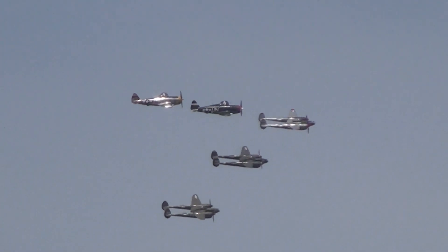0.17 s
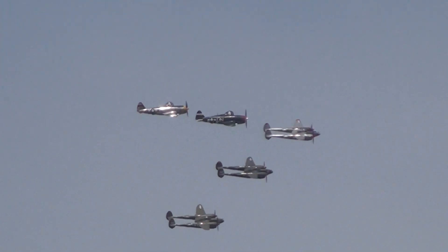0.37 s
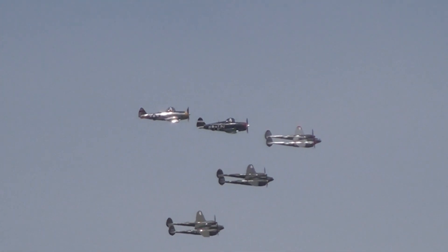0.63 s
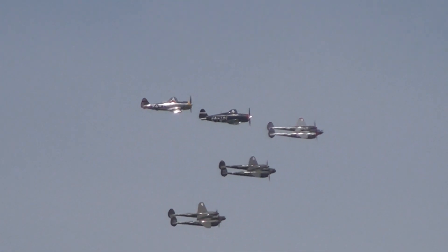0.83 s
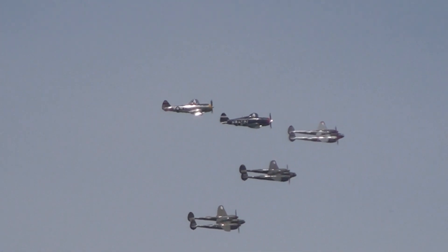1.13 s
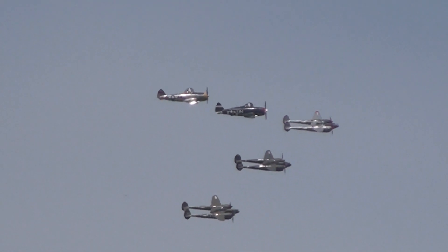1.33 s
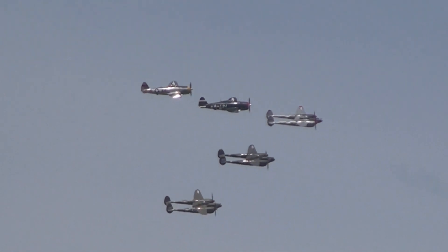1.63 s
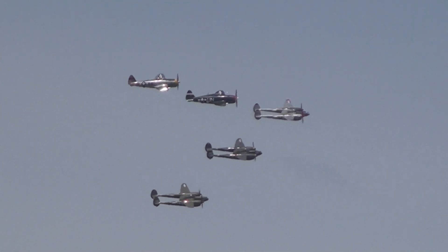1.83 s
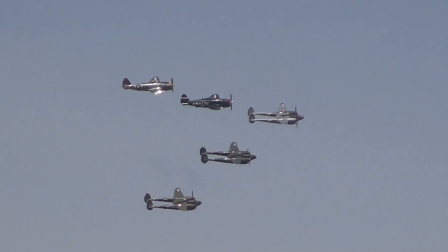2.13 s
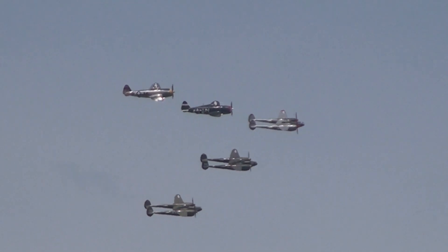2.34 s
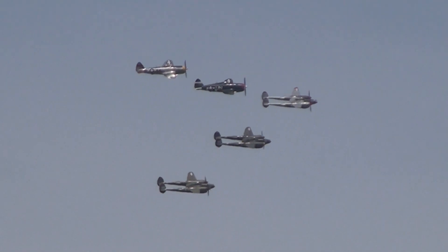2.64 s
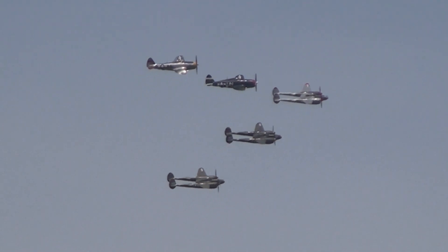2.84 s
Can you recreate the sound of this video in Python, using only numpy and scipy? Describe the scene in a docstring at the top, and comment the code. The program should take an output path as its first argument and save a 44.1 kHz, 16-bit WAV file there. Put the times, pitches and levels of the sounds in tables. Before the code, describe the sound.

A distant formation of piston-engined propeller aircraft drones throughout, low and throbbing, with a fluttering exhaust roar strongest around 0.4-0.7 s, pitch sagging slightly and the roar weaker by the end. Faint crackly scuffs and ticks near the microphone are scattered from 0.2 to 1.8 s. Hard, dry clicks cluster at 1.56-1.76 s, loudest near 1.67, with a very faint one at 2.85. Light wind rumble and soft hiss outdoors.

```python
"""Distant fighters in formation, clicks at the microphone

Piston-engined fighters pass far off: six propellers drone, three at nearly equal speeds that beat and three
slower, built from partials of their blade rates. Jittered firing pulses and puffs of gas merge into an exhaust
roar that fades and swells in the moving air, and the pitch sags slowly. Close to the microphone a small hard
object clicks, as short ringing modes with a noise crack, and rustles in noise bursts, amid light wind and hiss."""
import sys
import numpy as np
from scipy import signal
from scipy.fft import rfft, irfft
from scipy.io import wavfile
from scipy.ndimage import map_coordinates

SR = 44100
rng = np.random.default_rng(int(sys.argv[2]) if len(sys.argv) > 2 else 0)


def log_audio(samples):
    """Write samples as a 16-bit WAV file to the path given in sys.argv[1]."""
    # one column per channel
    frames = np.atleast_2d(samples).T
    # limit to full scale, then quantise
    limited = np.clip(frames, -1, 1)
    pcm = np.round(limited * 32767).astype(np.int16)
    wavfile.write(sys.argv[1], SR, pcm)


N = 132300
T = np.arange(N) / SR

# leading propellers, beating together: (blade rate before sag and wander [Hz], level among them [dB])
LEAD_PROPS = [(54.8, -1.5), (54.05, -13.5), (55.95, -28)]
# slower propellers under the drone: (blade rate before sag and wander [Hz], level before partial levels [dB])
SLOW_PROPS = [(49.57, -35), (46.34, -39.5), (43.02, -37)]
# swell of the far exhaust roar, before its trims: (time [s], level [dB])
ROAR_SWELL = [(0.0, -32), (0.08, -30.5), (0.2, -27.5), (0.34, -29.5), (0.44, -25), (0.54, -29.5),
              (0.64, -22), (0.74, -31.5), (0.78, -27.5), (1.14, -27.5), (1.2, -32.5), (1.52, -30.5),
              (1.6, -28), (1.66, -30.5), (1.72, -27.5), (1.84, -27), (1.9, -30.5), (2.04, -26.5),
              (2.18, -31.5), (2.6, -30), (2.78, -35), (2.82, -31.5), (3.0, -34.5)]


def undb(db):
    """Amplitude factor of a level in dB."""
    return 10 ** (np.asarray(db) / 20)


def unit(x):
    """Scale to an RMS of 1."""
    return x / np.sqrt(np.mean(x ** 2))


def curve(rows):
    """Gain over time from (time [s], level [dB]) points."""
    return undb(np.interp(T, *np.array(rows).T))


def colour(x, points):
    """Filter by (frequency [Hz], gain [dB]) points, falling a further 12 dB per octave outside them."""
    hz, db = np.array(points).T
    f = np.maximum(np.fft.rfftfreq(N, 1 / SR), 1)
    skirts = np.minimum(f / hz[0], 1) ** 2 * np.minimum(hz[-1] / f, 1) ** 2
    gain = undb(np.interp(np.log(f), np.log(hz), db))
    return irfft(rfft(x) * skirts * gain, N)


def noise():
    """White noise over the whole scene."""
    return rng.standard_normal(N)


def walk(rate):
    """Smooth chance with a spread near 1, changing at a rate per second."""
    return map_coordinates(rng.standard_normal(size=4096), [T * rate + 2], order=2, mode="wrap")


def burst(x, envelope):
    """Noise under an envelope, holding the energy that the envelope gives it."""
    return unit(x * envelope) * np.sqrt(np.mean(envelope ** 2))


def stereo(mid, side):
    """Left and right from mid and side."""
    return np.array([mid + side, mid - side])


def pan(db):
    """Left and right gains for a left-minus-right level in dB."""
    return undb(np.array([[db], [-db]]) / 2)


def blade_turns(hz):
    """Count of blade passes; the pitch sags as the approach slows, and wanders a little."""
    sag_per_s, wander = 0.009, 0.00199  # both relative to the pitch
    rate = hz * (1 - sag_per_s * T + wander * walk(2))
    return np.cumsum(rate) / SR + rng.random()


def partial(turns, k, flutter):
    """One multiple of a turning rate, with a share scattered by the air into both phases."""
    flutter_rate = 11  # changes per s
    angle = 2 * np.pi * (k * turns + rng.random())
    in_phase = (1 + flutter * walk(flutter_rate)) * np.sin(angle)
    quadrature = flutter * walk(flutter_rate) * np.cos(angle)
    return unit(in_phase + quadrature)


def propellers(lead, slow):
    """Leading propellers beat, their second to fourth partials each following a swell; slower ones lie below."""
    # swells of the leading second, third and fourth partials, before trims: (time [s], level [dB])
    second = [(0.0, -34.5), (0.12, -24.5), (0.18, -30), (0.26, -17), (0.42, -28.5), (0.72, -25),
              (0.86, -32.5), (0.98, -31), (1.04, -24.5), (1.1, -26.5), (1.14, -26.5), (1.3, -23),
              (1.54, -36), (1.78, -25.5), (1.86, -38), (1.96, -25), (2.08, -25.5), (2.28, -37), (2.34, -30),
              (2.38, -48), (2.52, -26.5), (2.72, -49), (2.76, -31), (2.84, -23.5), (2.9, -38), (2.94, -22),
              (3.0, -40)]
    third = [(0.0, -44.5), (0.3, -34.0), (0.62, -35.5), (0.7, -26.5), (0.86, -25), (1.08, -57),
             (1.12, -35.5), (1.54, -32), (1.7, -48.5), (1.92, -26), (2.02, -23.5), (2.18, -38.0),
             (2.54, -29), (2.64, -35), (2.86, -31), (3.0, -51)]
    fourth = [(0.0, -48), (0.36, -43), (0.48, -38), (0.54, -48), (0.62, -30.5), (0.74, -27.5), (1.0, -43),
              (1.28, -32.5), (1.42, -31.5), (1.5, -41), (1.7, -30.5), (1.82, -28.5), (1.96, -33),
              (2.06, -34.5), (2.3, -43.5), (2.58, -35.5), (3.0, -39)]
    # swell of the slow fourth partial, of which only the shape counts: (time [s], level [dB])
    slow_fourth = [(0.0, -37), (0.52, -39), (0.66, -41.5), (1.08, -33.5), (1.32, -39.5), (1.44, -49),
                   (1.94, -33), (2.0, -35), (2.16, -41), (2.44, -43), (2.88, -35), (3.0, -39)]
    # leading multiples 1-5 of the blade rate: level [dB]; 2-4 are trims on their swells
    lead_partials = [-36.5, 0.5, -0.5, -1, -49.5]
    # slow multiples 1-5 of the blade rate: level relative to the propeller [dB]
    slow_partials = [-17, -1, -5, -2.5, -11.5]
    lead_flutter, slow_flutter = 0.3, 0.46  # shares scattered by the air

    out = 0
    swells = [1, curve(second), curve(third), curve(fourth), 1]
    for k, (swell, db) in enumerate(zip(swells, lead_partials), 1):
        beating = sum(undb(prop_db) * partial(turns, k, lead_flutter)
                      for turns, (_, prop_db) in zip(lead, LEAD_PROPS))
        out = out + swell * undb(db) * unit(beating)
    swells = [1, 1, 1, unit(curve(slow_fourth)), 1]
    for turns, (_, prop_db) in zip(slow, SLOW_PROPS):
        for k, (swell, db) in enumerate(zip(swells, slow_partials), 1):
            out = out + swell * undb(prop_db + db) * partial(turns, k, slow_flutter)
    return out


def firings(turns):
    """Twelve uneven cylinders fire in turn, each with a puff of gas."""
    firings_per_blade, jitter_s, gas_share = 4, 0.00038, 0.55
    cylinder_db, firing_db = 2, 2  # spread between cylinders and between firings
    cycle = turns * firings_per_blade
    at = np.flatnonzero(np.diff(np.floor(cycle)))
    cylinders = np.resize(rng.standard_normal(size=12), len(at))
    size_chance, time_chance = rng.standard_normal((2, len(at)))
    size = undb(cylinder_db * cylinders + firing_db * size_chance)
    jittered = (at + jitter_s * SR * time_chance).astype(int) % N
    pulses = np.bincount(jittered, size - size.mean() / 2, N)
    gas = np.exp(-2 * (cycle % 1)) * noise()
    return unit(pulses - pulses.mean()) + gas_share * unit(gas)


def exhausts(engines):
    """Firings merge into rumble, roar and rasp, each following its swell; a second path adds slow phasing."""
    # swells of the low rumble and of the upper rasp, before trims: (time [s], level [dB])
    rumble_swell = [(0.0, -23), (0.1, -35), (0.24, -26.5), (0.58, -27), (0.86, -29.5), (0.96, -21.5),
                    (1.02, -31), (1.22, -26), (1.42, -27.5), (1.74, -32), (1.96, -29), (2.04, -27),
                    (2.14, -25.5), (2.42, -38.5), (2.66, -35), (2.74, -33), (3.0, -44)]
    rasp_swell = [(0.0, -46), (0.04, -42.5), (0.16, -37), (0.28, -45), (0.32, -37.5), (0.42, -35.5),
                  (0.5, -40.5), (0.54, -40.5), (0.6, -44.5), (0.64, -36), (0.72, -39), (0.9, -44),
                  (1.3, -50.5), (1.34, -46.5), (1.74, -42.5), (1.8, -48.5), (1.98, -45.5), (2.18, -47.5),
                  (2.4, -47), (2.68, -42.5), (2.74, -47.0), (3.0, -49.5)]
    # colours of the three exhaust bands: (frequency [Hz], relative gain [dB])
    rumble_colour = [(25, -46), (42, -4), (52, 0), (62, -16), (72, 0.5), (90, 3.5), (102, -2.5), (128, 0.5),
                     (190, -15), (245, -15.5), (300, -19), (450, -33.5)]
    roar_colour = [(200, -34), (310, -10), (375, -1.5), (430, -3), (485, 2.5), (545, -1), (605, -1.5),
                   (660, -7.5), (745, -13), (830, -23.5), (1200, -70)]
    rasp_colour = [(700, -14.5), (860, -7), (930, 1), (975, 2), (1040, 2), (1130, -1.5), (1270, -10),
                   (1450, -19.5), (2400, -42), (4000, -41)]
    echo_s, echo_s_per_s, echo_share = 0.00717, 0.002463, 0.23

    pulses = sum(firings(turns) for turns in engines)
    # the lengthening second path sweeps shallow ripples down the roar
    echo_at = (T - echo_s - echo_s_per_s * T) * SR
    phased = pulses + echo_share * map_coordinates(pulses, [echo_at], order=1, mode="wrap")
    bands = [(pulses, rumble_colour, rumble_swell, -0.5),  # last: trim in dB
             (phased, roar_colour, ROAR_SWELL, -1.9),
             (phased, rasp_colour, rasp_swell, -1)]
    return sum(unit(colour(x, shape)) * curve(swell) * undb(db) for x, shape, swell, db in bands)


def strands():
    """Wavering exhaust harmonics stand out of the roar; now and then a narrow band swells and slides down."""
    # steady harmonics: (frequency before sag and wander [Hz], level relative to the roar swell [dB])
    exhaust_tones = [(380, -15.5), (421, -12), (482, -12), (519, -13.5), (606, -13)]
    # falling strands, sounding at 0.96 of the pitch listed: (middle [s], length between 1/e points [s],
    # pitch at the middle [Hz], level at the middle [dB], relative fall [1/s])
    slides = [(.16, 0.12, 985, -41, 0.11), (0.191, 0.088, 1110, -40, 0.096),
              (0.419, 0.17, 1000, -38.5, .15), (1.12, 0.18, 476, -33, 0.61), (1.36, 0.18, 393, -33.5, .6),
              (2.002, .16, 412, -36.5, .9), (2.051, 0.11, 492, -28, .4)]
    flutter = 0.41  # share scattered by the air

    tones = sum(undb(db) * partial(blade_turns(hz), 1, flutter) for hz, db in exhaust_tones)
    out = tones * curve(ROAR_SWELL)
    for s, length, hz, db, fall in slides:
        turns = np.cumsum(hz * np.exp(-fall * (T - s))) / SR
        swell = np.exp(-(2 * (T - s) / length) ** 2)
        out = out + undb(db) * swell * partial(turns, 0.96, flutter)
    return out


def air():
    """Light wind on the microphone and a faint hiss, wide in its lower part and narrow at the top."""
    # wind on the microphone, before its trim: (time [s], level [dB])
    wind_swell = [(0, -42.5), (.26, -67), (.5, -42), (.8, -36.5), (1.1, -39), (1.36, -46), (1.8, -54),
                  (2.3, -38), (2.6, -36.5), (2.8, -33), (2.92, -31.5), (3, -35)]
    # colours of the wind and of the hiss in middle and side: (frequency [Hz], relative gain [dB])
    wind_colour = [(10, -25), (25, 1), (40, -21), (70, -12), (150, -16)]
    hiss_mid = [(700, 7), (1400, 8.5), (2200, 1), (3200, -3.5), (4500, -7), (7000, -9), (9700, -12.5),
                (12800, -10), (15500, -14.5)]
    hiss_side = [(600, 10), (1200, 9.5), (2000, 4), (3200, -3), (5000, -8), (8000, -12.5), (10500, -15),
                 (12000, -32), (15500, -44)]
    wind_db, wind_side_db = -0.5, 4.5  # trim, side relative to mid
    hiss_db, hiss_side_db = -53.5, 0.5  # level, side relative to mid

    wind = stereo(unit(colour(noise(), wind_colour)),
                  undb(wind_side_db) * unit(colour(noise(), wind_colour)))
    hiss = stereo(unit(colour(noise(), hiss_mid)),
                  undb(hiss_side_db) * unit(colour(noise(), hiss_side)))
    return undb(wind_db) * curve(wind_swell) * wind + undb(hiss_db) * hiss


def rustles():
    """Brief crackly scuffs close to the microphone build up and die away, each with a small resonance."""
    # faint ticks and scuffs: (time of peak [s], level before panning [dB], decay [s], resonance [Hz])
    scuffs = [(0.239, -50, 0.038, 8000), (0.254, -39, 0.0049, 7500), (0.287, -46, 0.0097, 3460),
              (.301, -39.5, 0.0027, 3530), (0.314, -45, 0.0037, 4950), (0.372, -43.5, 0.0023, 6700),
              (0.5108, -41, 0.0014, 4500), (0.621, -47, 0.0037, 7440), (.634, -48, 0.0017, 8550),
              (.669, -55.5, 0.017, 9050), (.691, -41, .003, 1910), (.858, -55, 0.036, 7100),
              (0.865, -42, 0.0085, 3350), (0.945, -38, 0.0027, 3000), (0.9587, -43.5, 0.0073, 4630),
              (1.0216, -42, 0.0018, 4020), (1.22, -48, 0.0027, 4000), (1.538, -43.5, 0.002, 5000),
              (1.798, -43.5, 0.0016, 6900)]
    rise_share = 0.15  # build-up as a share of the decay
    crackle_rate, crackle_db = 450, 6  # changes per s, spread

    out = 0
    for s, db, decay, hz in scuffs:
        shape = [(hz / 4, 11.5), (hz * 0.9, 0), (hz, 7.5), (hz * 1.22, -2), (hz * 2, -10.5)]
        grains = colour(noise() * undb(crackle_db * walk(crackle_rate)), shape)
        fade_s = decay * np.where(T < s, rise_share, 1)
        out = out + undb(db) * burst(grains, np.exp(-np.abs(T - s) / fade_s))
    return out * pan(-6)


def clicks():
    """Each contact rings the object's short modes, with a crack and a faint tail.

    Some contacts sound thinner, with their low modes weakened.
    Low and high modes shift separately with the place of contact."""
    # contacts: (time [s], level [dB], pitch factor of low modes, pitch factor of high modes,
    # treble tilt [dB per octave], low edge [Hz])
    contacts = [(1.5624, -11.5, .91, 1.09, 3.5, 850), (1.6714, -7, 1.048, 0.994, -1, 750),
                (1.6914, -18, 0.97, .89, 2, 900), (1.7204, -22, 1.19, 0.91, 2.5, 1700),
                (1.7590, -17.5, 1.04, 1.027, -1, 1710), (2.851, -33, 1.09, 0.83, -3, 2010)]
    # modes of the object before shift and tilt: (frequency [Hz], level [dB], t60 [s], left minus right [dB])
    modes = [(1190, -6.5, 0.0069, -20), (1384, -9.5, 0.0071, -15.5), (2110, 0, 0.0057, -11),
             (3840, -8.5, 0.0079, -4), (4660, -13, 0.0057, -11), (6600, -1.5, 0.0052, -5),
             (7150, -0.5, 0.0039, 2), (7970, -10, 0.0054, 10), (10100, -18.5, 0.009, 9),
             (12100, -22, 0.0044, 10)]
    # colour of the crack before shift and tilt: (frequency [Hz], relative gain [dB])
    crack_colour = [(500, -24), (1050, 11.5), (1600, 2), (2400, 0), (4300, -2), (7500, -3), (10000, -15),
                    (11500, -20), (15000, -27)]
    crack_db, crack_s, tail_db, tail_s = -5.5, 0.0015, -28, 0.0099
    crack_side_db, crack_pan_db, onset_s = -8, -7.5, 0.00057

    out = np.zeros((2, N))
    t = T[:SR // 10]
    onset = 1 - np.exp(-t / onset_s)
    spray = undb(crack_db) * np.exp(-t / crack_s) + undb(tail_db) * np.exp(-t / tail_s)
    for s, db, low_pitch, high_pitch, tilt_db, edge_hz in contacts:
        start = int(s * SR)
        span = slice(start, start + len(t))

        def contact_db(hz):
            """Tilt about 4 kHz and loss below the low edge."""
            return tilt_db * np.log2(hz / 4000) - 10 * np.log10(1 + (edge_hz / hz) ** 6)

        def shifted(hz):
            """Pitch moved by the place of contact."""
            return hz * np.interp(hz, [4000, 6500], [low_pitch, high_pitch])

        shape = [(shifted(hz), gain_db + contact_db(hz)) for hz, gain_db in crack_colour]
        mid, side = (burst(colour(noise(), shape)[span], spray) for _ in range(2))
        crack = stereo(mid, undb(crack_side_db) * side) * pan(crack_pan_db)
        ring = 0
        for k, (hz, mode_db, t60, pan_db) in enumerate(modes):
            tone = np.exp(-np.log(1000) * t / t60) * np.sin(2 * np.pi * shifted(hz) * t)
            # neighbouring modes alternate in polarity
            ring = ring + (-1) ** k * pan(pan_db) * undb(mode_db + contact_db(hz)) * tone
        out[:, span] += undb(db) * (ring + crack) * onset
    return out


def scene():
    """The far formation spread by scattering, with the near object and the air around the microphone."""
    # width of the far sound: (frequency [Hz], side minus mid [dB])
    width = [(30, 13), (70, -19), (160, -13), (500, -15.5), (1000, -20.5), (3000, -4)]
    lead = [blade_turns(hz) for hz, _ in LEAD_PROPS]
    slow = [blade_turns(hz) for hz, _ in SLOW_PROPS]
    # the same turns with fresh chance for mid and side
    direct, scattered = (propellers(lead, slow) + exhausts(lead + slow) + strands() for _ in range(2))
    formation = stereo(direct, colour(scattered, width))
    return formation + air() + rustles() + clicks()


def record(dry):
    """The recorder cuts the top above 15.8 kHz with a steep low-pass."""
    low_pass = signal.ellip(10, .2, 80, 15800, fs=SR, output="sos")
    return signal.sosfilt(low_pass, dry)


dry = scene()
out = record(dry)
log_audio(out)
```